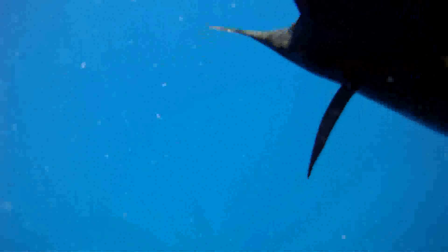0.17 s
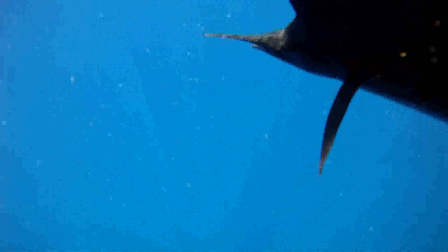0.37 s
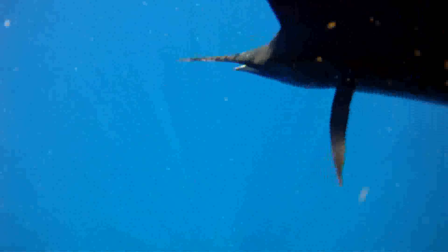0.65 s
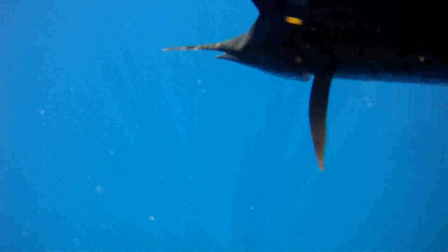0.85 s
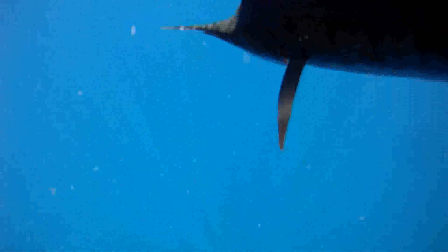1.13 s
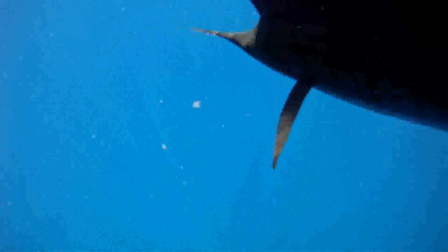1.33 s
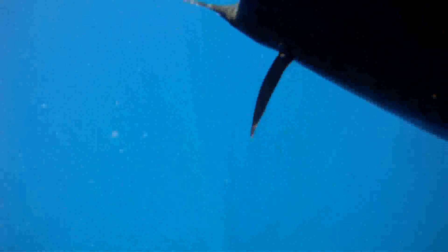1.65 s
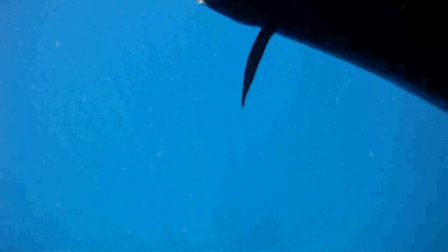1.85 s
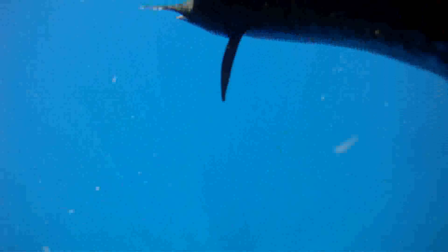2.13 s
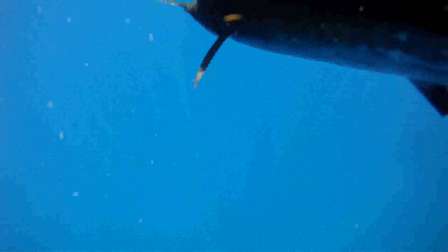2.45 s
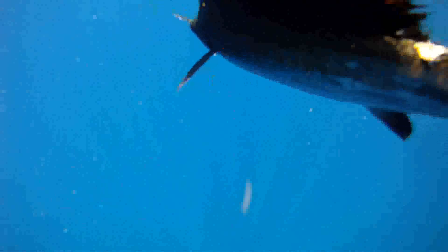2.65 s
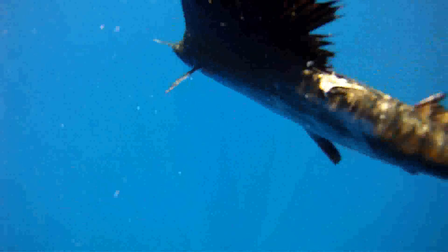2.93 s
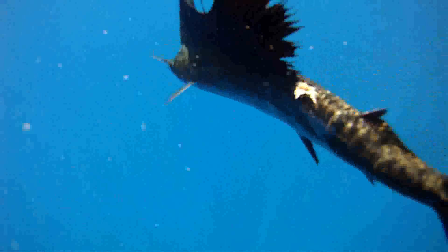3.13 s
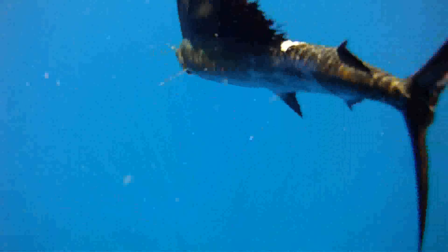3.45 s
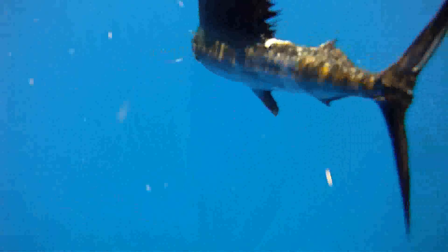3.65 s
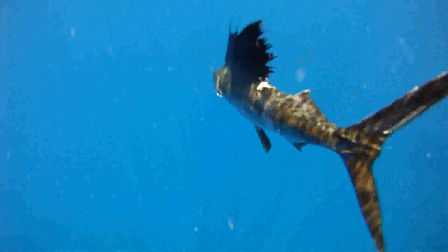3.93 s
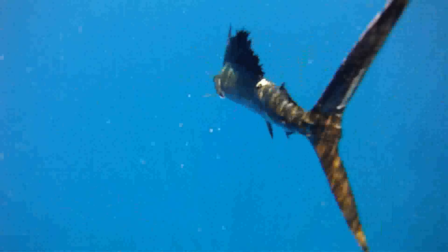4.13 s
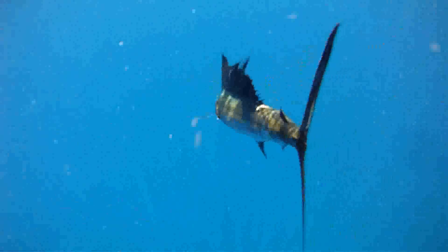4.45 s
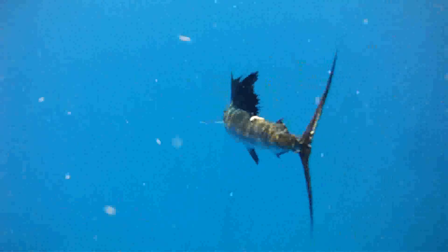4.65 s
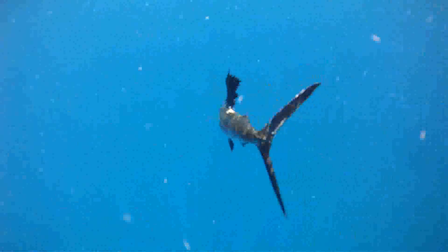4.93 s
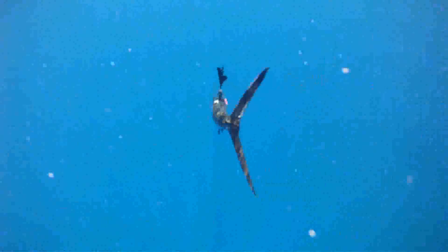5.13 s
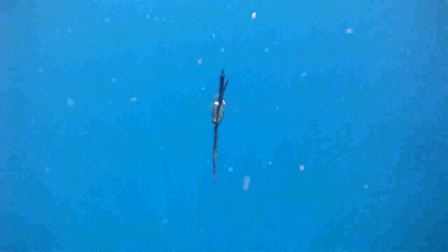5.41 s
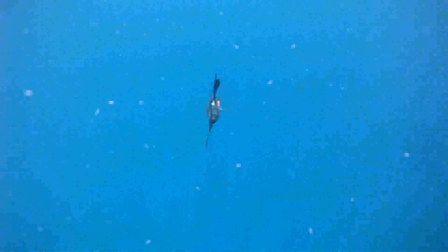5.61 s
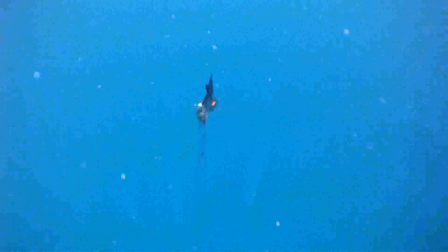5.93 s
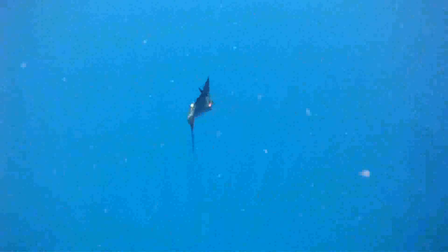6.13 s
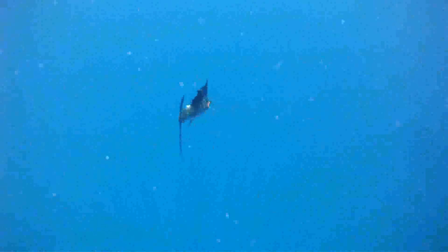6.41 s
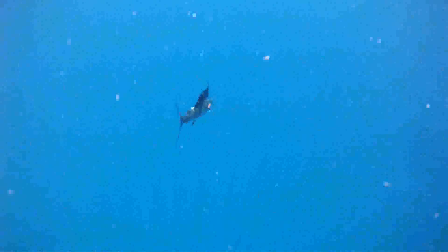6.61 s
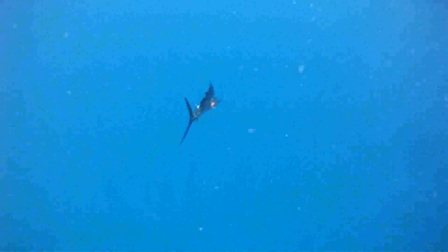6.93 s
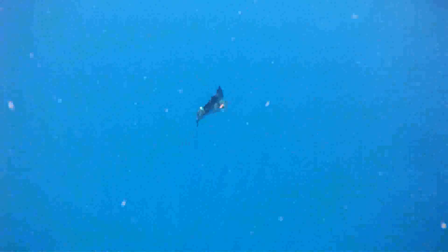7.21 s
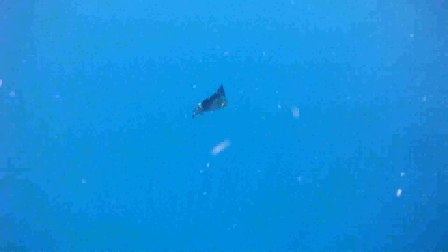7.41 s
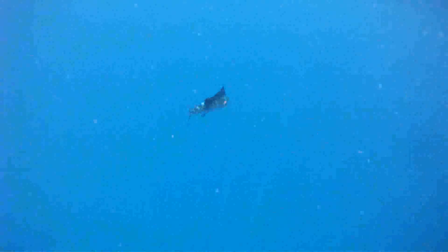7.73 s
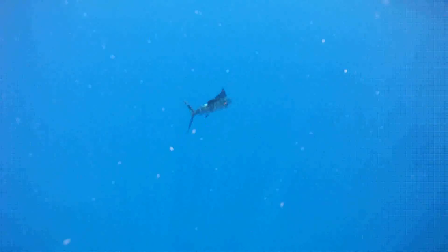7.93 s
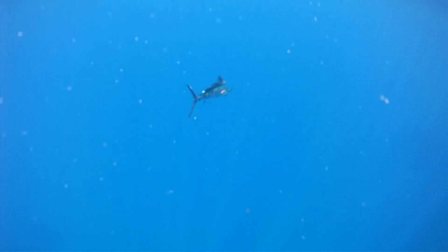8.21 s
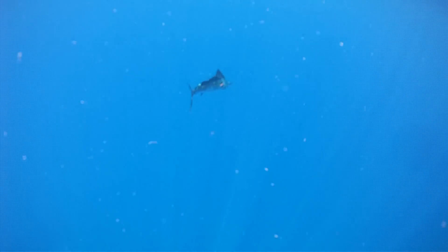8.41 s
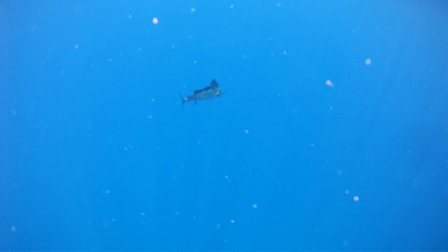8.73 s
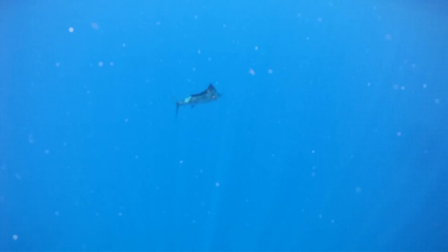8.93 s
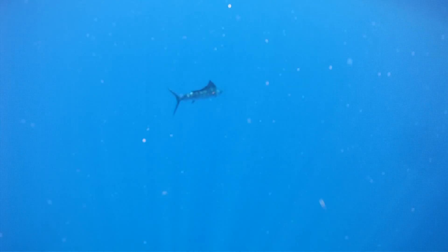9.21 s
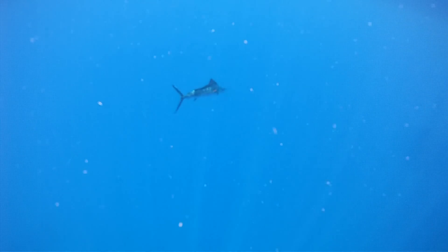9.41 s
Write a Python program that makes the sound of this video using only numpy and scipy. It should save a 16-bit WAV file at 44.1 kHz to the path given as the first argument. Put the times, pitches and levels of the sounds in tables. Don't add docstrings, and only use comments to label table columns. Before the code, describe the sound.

Under water, a diesel boat engine idles steadily, a fast uneven chug with rattle and gear whine. Water sloshes low around a sealed camera case. A hard thump comes early, another near two seconds, then a flurry of scuffs, clicks, squeaks and knocks until about four seconds. Afterwards the engine carries on alone, gradually weaker. The sound is boxy, gritty and low quality.

```python
import sys
import numpy as np
from scipy import signal
from scipy.io import wavfile
from scipy.ndimage import uniform_filter1d

SR = 44100
rng = np.random.default_rng(int(sys.argv[2]) if len(sys.argv) > 2 else 0)


def put_to_file(sound):
    columns = np.atleast_2d(sound).T
    safe = np.clip(columns, -1, 1)
    whole_steps = np.round(safe * 32767)
    wavfile.write(sys.argv[1], SR, whole_steps.astype(np.int16))


def invert_db(level):
    return 10 ** (np.asarray(level, dtype=float) / 20)


N = 421596
TIME = np.arange(N) / SR

# [t/s, level/dB]
STIR = [(0, -48), (.3, -41), (.84, -44), (1.25, -33.5), (1.65, -42), (2.4, -34.5), (3.1, -33.5), (3.7, -23),
        (4.1, -31.5), (4.7, -29.5), (5.1, -32.5), (6.1, -39), (6.6, -34), (7.5, -38.5), (8.1, -38.5),
        (8.6, -35), (9.3, -41), (9.56, -40)]
# [t/s, swell/dB, half length/s]
SURGES = [(.2, 3, .2), (0.564, 14, 0.21), (1.068, 14, 0.11), (1.424, 8, 0.13), (2.08, 21, .06),
          (2.253, 8, 0.11), (2.503, 6, 0.081), (2.797, 13, .09), (3.307, 5, .1), (3.897, 6, 0.2),
          (4.03, 3, .08), (4.25, 4.5, .08), (5.4, 11.5, .08), (6.542, 3, 0.17), (7.254, 4, 0.11),
          (7.897, 3, 0.14)]
# [t/s, peak level/dB, f/Hz, rise/(1/s), t60/s]
BUBBLES = [
    (.524, -25, 445, 2.0, .4),
    (.603, -30, 830, 3.0, .12),
    (.635, -30, 600, 8.0, .15),
    (3.4375, -15, 3750, -7, .018),
    (3.377, -9, 2100, 3, .026),
    (3.371, -17, 3600, 0, .02),
    (3.24, -10, 3500, 0, .012),
    (4.187, -16, 2550, 8, .02),
    (4.173, -18, 2200, 0, .02),
]
# [f/Hz, level/dB, t60/s]
SHELL_MODES = [(350, -9.5, 0.0035), (672, -12.5, 0.023), (1000, -19, 0.004), (1595, -13, 0.0098),
               (2220, -8.5, 0.023), (2630, 1, 0.0051), (3600, -3, 0.014), (4570, -18, 0.0088),
               (5750, 9, 0.011)]
# [t/s, peak level/dB, contact colour f/Hz, length/s]
SCUFFS = [(1.051, -23.5, 300, 0.0221), (1.057, -18, 597, .012), (1.202, -25, 345, 0.071),
          (1.332, -24, 365, 0.056), (2.751, -27, 352, 0.017), (2.851, -28, 900, 0.046),
          (2.961, -22, 424, .0087), (3.011, -23.5, 900, .03), (3.133, -23.5, 460, 0.051),
          (3.333, -18, 376, 0.015), (3.355, -13, 670, .011), (3.488, -17, 624, .014),
          (3.749, -14, 710, 0.025), (3.78, -16, 300, 0.00566), (3.874, -26, 392, 0.011),
          (8.603, -27.5, 500, 0.0063)]
# [t/s, peak level/dB, contact colour f/Hz, length/s]
CLICKS = [(3.241, -22, 3500, .001), (3.3663, -1.5, 1840, .001), (3.369, -28, 3600, .0025),
          (3.376, -15, 2400, .0093), (3.393, -33, 3500, .006), (3.407, -19, 3300, .0026),
          (3.835, -20, 3600, .002), (3.979, -23, 3600, .0042), (3.989, -7, 3020, .0055),
          (4.082, -17, 3700, .002), (4.0835, -14, 1700, .002), (4.176, -38, 2380, .003),
          (4.183, -38, 2700, .001)]
# [t/s, peak level/dB, contact colour f/Hz, length/s, first swing/sign]
KNOCKS = [(0.891, -11.5, 460, 0.004, -1), (1.9807, -16, 520, .001, -1), (1.9822, 1.5, 515, .001, -1),
          (3.218, -12, 650, 0.0033, -1), (3.777, -13, 700, .003, -1), (3.798, -9.5, 740, 0.0026, 1),
          (3.836, -5.5, 1300, .0028, -1), (3.861, -10, 630, .0026, -1), (3.87, -12, 680, 0.00267, 1),
          (3.99, -11, 1000, 0.004, 1), (4.019, -13.5, 1300, 0.0018, 1)]
# [t/s, peak level/dB, f/Hz, t60/s]
SNAPS = [
    (.893, -6, 168, 0.051),
    (1.9839, -3.5, 167, 0.036),
    (3.8372, -2, 127, 0.019),
]
# [t/s, peak level/dB, f/Hz, first swing/sign]
SHOVES = [(0.896, -1.5, 79.5, 1), (1.9852, -8, 64, 1), (2.762, -10.5, 57, 1), (2.948, -16, 43.8, -1),
          (3.206, -18.5, 69, 1), (3.238, -17, 63.3, -1), (3.343, -14, 52, 1), (3.373, -12, 43.7, -1),
          (3.481, -19, 58.6, -1), (3.61, -6.5, 57, 1), (3.666, -10.5, 48, 1), (3.743, -17, 49, -1),
          (3.801, -7.5, 55, -1), (3.842, -14, 50, 1), (3.868, -6, 73.4, 1), (3.887, -26, 55, 1)]
# [t/s, peak level/dB, f/Hz, t60/s]
POLE_RINGS = [(.482, -20, 115, 0.41), (.69, -29, 110, .12), (.911, -21, 56.6, .24),
              (.915, -17.5, 110, 0.19), (1.059, -36, 54, .17), (2.008, -25, 53.7, 0.59),
              (2.201, -29, 94.4, .25), (2.773, -27.5, 159, 0.38), (2.953, -32, 157, 0.6),
              (3.2, -29, 149, 0.24), (3.34, -21.5, 150, .12), (3.502, -14.5, 61, .36),
              (3.776, -17, 150, 0.19), (.25, -34, 130, .3), (3.885, -21, 100, .2), (3.995, -25.5, 90, .2)]
# [t/s, engine cycles done]
CRANK = [(-.112, -1), (.256, 1), (.806, 4), (1.357, 7), (2.463, 13), (4.649, 25), (6.313, 34), (7.786, 42),
         (9.098, 49), (9.662, 52)]
# [low knock level/dB, high knock level/dB]
CYLINDERS = [(-9.5, -8), (-11.5, -31), (-14.5, -0.5), (-14, -25), (-16, -8.5), (-35, -11)]
# [t/s, level/dB, distance/0-1]
ENGINE = [(0.0, -32, 0.4), (0.64, -36.5, 0.3), (0.95, -34.5, 0.5), (1.2, -28.5, 0.7), (1.81, -29, 0.58),
          (2.37, -28, 0.54), (2.9, -26.5, 0.67), (3.4, -29, 0), (3.9, -35, 0.06), (4.21, -30, 0.24),
          (4.85, -28.5, 0.36), (5.22, -32, 0.22), (6.47, -29.5, 0.5), (6.8, -31.5, 0.45),
          (7.27, -37.5, 0.13), (7.59, -38.5, 0.27), (8.41, -34.5, 0.25), (9.56, -34.5, 0.02)]
# [f/Hz, width/Hz, near level/dB, far level/dB]
LOW_MODES = [(349, 39, -10.5, -15.5), (500, 29.6, -2, -8.5), (582, 78, -0.5, -3), (666, 54.4, 5.5, 3.5),
             (747, 74, 4.5, -0.5), (824, 257, -5, -11)]
# [f/Hz, width/Hz, near level/dB, far level/dB]
HIGH_MODES = [(1300, 161, 2, -2), (1494, 126, 2.5, 0.5), (1700, 210, -2.5, -12), (1850, 33, -24, -8.5),
              (2144, 152, -1, -4), (2390, 140, 2, -4.5), (2710, 56, -13, -8), (3130, 510, -14, -20),
              (3435, 330, -14.5, -22.5), (3713, 164, -12.5, -21.5), (4094, 640, -20.5, -27.5),
              (4846, 110, -16.5, -18), (5384, 580, -15.5, -20.5)]
# [multiple of tooth rate, level over the low ring/dB]
GEAR = [(1, -27), (3, -13), (4, 1.5), (8, -22)]
# [t/s, fourth multiple of the tooth rate f/Hz]
MESH = [(0, 653), (1.2, 648), (1.7, 657), (2.15, 655), (2.55, 641), (3.1, 663), (3.6, 653), (4.9, 653),
        (5.25, 634), (5.7, 650), (6.2, 645), (6.6, 655), (7.1, 648), (7.6, 652), (8.35, 633), (9.56, 655)]
# [place in cycle/0-1, half length/0-1, depth/dB]
LULLS = [(.94, .045, 8), (.29, .03, 3), (.62, .03, 2.5)]
# [t/s, depth/dB, recovery/s]
DUCKS = [
    (0.902, 10, 0.084),
    (1.99, 16, 0.16),
    (3.842, 5, 0.025),
]


def rms_one(x):
    return x / np.sqrt(np.mean(x ** 2) + 1e-20)


def in_time(rows):
    s, *columns = np.transpose(rows)
    return [np.interp(TIME, s, c) for c in columns]


def drift(rate_hz):
    knots_hz = 200
    knots = rng.standard_normal(int(N / SR * knots_hz) + 400)
    r = np.exp(-2 * np.pi * rate_hz / knots_hz)
    slow = rms_one(signal.lfilter([1], [1, -2 * r, r * r], knots)[300:])
    return np.interp(TIME * knots_hz, np.arange(len(slow)), slow)


def band(x, low_hz, high_hz, order=2):
    return signal.sosfilt(signal.butter(order, [low_hz, high_hz], "band", fs=SR, output="sos"), x)


def add(out, s, sound):
    at = round(s * SR)
    out[at:at + len(sound)] += sound[:N - at]


def water():
    stir_db, = in_time(STIR)
    surge_db = sum(db * np.clip(1 - abs(TIME - s) / half_s, 0, 1) for s, db, half_s in SURGES)
    handled_until_s, settle_s = 3.91, 0.38
    calm = np.clip((TIME - handled_until_s) / settle_s, 0, 1)
    slosh_db = stir_db + surge_db
    rumble_db = -47.5 + 0.36 * (stir_db + 36) + 0.47 * surge_db - 9 * calm
    gurgle_db = -46.5 + 0.31 * (stir_db + 32.5) + 0.22 * surge_db - 7.5 * calm
    slosh = band(band(rng.standard_normal(N), 9.4, 61.7, order=3), 25.9, 58)
    rumble = band(rng.standard_normal(N), 83.5, 115.4)
    gurgle = band(rng.standard_normal(N), 159.6, 187.0)
    gurgle = gurgle + invert_db(-3.5) * band(rng.standard_normal(N), 180, 443)
    layers = [(slosh, slosh_db, 1.8), (rumble, rumble_db, 3.5), (gurgle, gurgle_db, 3.0)]
    return sum(invert_db(db + lumps_db * drift(10.0)) * rms_one(noise) for noise, db, lumps_db in layers)


def bubbles():
    out, t = np.zeros(N), TIME[:SR // 3]
    for s, db, hz, rise, t60_s in BUBBLES:
        envelope = invert_db(db - 60 * t / t60_s) * (1 - np.exp(-t / 0.0028))
        add(out, s, envelope * np.sin(2 * np.pi * hz * (t + rise * t * t / 2)))
    return out


def taps():
    out, t = np.zeros(N), TIME[:SR // 10]
    crack = rng.standard_normal(len(t))
    every = [(*row, 1) for row in SCUFFS + CLICKS] + KNOCKS
    draws = rng.random((len(every), 30))
    for (s, db, colour_hz, length_s, swing), draw in zip(every, draws):
        count = int(np.clip(round(1 + np.log2(length_s * 1000)), 1, 8))
        order = np.arange(count)
        when_s = (order + 0.72 * draw[:count] * (order > 0)) / count * length_s
        contacts = np.zeros(len(t))
        contacts[(when_s * SR).astype(int)] = np.sign(swing) * (.5 + .5 * draw[8:8 + count])
        shell = invert_db(3 - 60 * t / 0.016) * crack
        for (hz, level_db, t60_s), u in zip(SHELL_MODES, draw[16:]):
            shell = shell + invert_db(level_db + 1.5 * (u + 2.0) - 60 * t / t60_s) * np.sin(2 * np.pi * hz * t)
        tap = signal.fftconvolve(contacts, shell)[:len(t)]
        tap = band(tap, colour_hz * 0.49, colour_hz * 1.436, order=3)
        add(out, s, invert_db(db) * tap / np.max(np.abs(tap)))
    return out


def thumps():
    out, t = np.zeros(N), TIME[:SR // 2]
    blows = [(s, db, hz, t60_s, -1, .03) for s, db, hz, t60_s in SNAPS]
    for s, db, hz, swing in SHOVES:
        blows.append((s, db, hz, (1.3 - 0.12 * db) / hz, swing, .26 - .014 * db))
    blows += [(s, db, hz, t60_s, 1, 0.0035 * hz) for s, db, hz, t60_s in POLE_RINGS]
    for s, db, hz, t60_s, swing, build in blows:
        swell = 1 - np.exp(-(t * hz / max(build, .01)) ** 2)
        swings = np.sin(2 * np.pi * hz * t) * invert_db(-60 * t / t60_s) * swell
        add(out, s, np.sign(swing) * invert_db(db) * swings / np.max(np.abs(swings)))
    return out


def resonances(x, modes, distance, patchy_db):
    out = 0
    for k, (hz, width_hz, near_db, far_db) in enumerate(modes):
        r = np.exp(-np.pi * width_hz / SR)
        poles = [1, -2 * r * np.cos(2 * np.pi * hz / SR), r * r]
        ring = signal.lfilter([(1 - r * r) / 2, 0, (r * r - 1) / 2], poles, x)
        level_db = near_db + (far_db - near_db) * distance + patchy_db * drift(4.5)
        out = out + (-1) ** k * ring * invert_db(level_db)
    return rms_one(out)


def firings(cycles, knock_db, t60_s, snap_db, luck):
    stroke = np.floor(cycles * 6).astype(int)
    at = np.flatnonzero(np.diff(stroke)) + 1
    kicks = np.zeros(N)
    kicks[at] = invert_db(np.array(knock_db)[stroke[at] % 6] + 1.5 * luck[:len(at)])
    beat = signal.lfilter([1], [1, -invert_db(-60 / (t60_s * SR))], kicks) + 1
    return beat * rng.standard_normal(N) + invert_db(snap_db) * kicks, beat


def gear_whine(teeth, low_beat):
    shake = .12 * drift(5.0) + .17 * drift(14.0)
    whine = sum(invert_db(db + 1.5 * drift(3.2)) * np.sin(k * (2 * np.pi * teeth + shake)) for k, db in GEAR)
    return whine * rms_one(uniform_filter1d(low_beat, size=220))


def singing_plate(chopped):
    middle_s, half_s = 4.85, 0.87
    facing = np.sqrt(np.clip(1 - ((TIME - middle_s) / half_s) ** 2, 0, 1))
    return invert_db(-11) * facing * resonances(chopped, [(1828, 24, 0, 0)], 0, patchy_db=1.0)


def engine():
    low_db, distance = in_time(ENGINE)
    high_db = -36.5 + 0.59 * (low_db + 31)
    distance = np.clip(distance + np.clip((TIME - 4.2) / 1.1, -.5, .5), 0, 1)
    cycles, = in_time(CRANK)
    teeth = np.cumsum(in_time(MESH)[0]) / 4 / SR
    low_knock_db, high_knock_db = np.transpose(CYLINDERS)
    luck = np.clip(rng.standard_normal(400), -1.5, 1.5)
    low_drive, low_beat = firings(cycles, low_knock_db, t60_s=.08, snap_db=27, luck=luck)
    high_drive, _ = firings(cycles, high_knock_db, t60_s=.2, snap_db=22, luck=luck)
    low = resonances(low_drive, LOW_MODES, distance, patchy_db=.6)
    chopped = (1 + 0.24 * np.cos(2 * np.pi * teeth)) * high_drive
    high = resonances(chopped, HIGH_MODES, distance, patchy_db=0.84) + singing_plate(chopped)
    whine = gear_whine(teeth, low_beat)
    lull_db = sum(db * np.clip(1 - ((cycles % 1 - at) / half) ** 2, 0, 1) for at, half, db in LULLS)
    low_db = low_db - 1.5 - lull_db
    high_db = high_db + 3.5 - .55 * lull_db
    return invert_db(low_db) * (band(low, 201, 1900) + whine) + invert_db(high_db) * band(high, 1365, 6360)


def ducking():
    loss_db = 0
    for s, db, back_s in DUCKS:
        loss_db = loss_db + db * (TIME > s) * np.clip(1 - ((TIME - s) / back_s) ** 2, 0, 1)
    return invert_db(-uniform_filter1d(loss_db, size=200))


def scene():
    return (ducking() * (water() + engine()) + bubbles() + taps() + thumps())[None]


def roll_off(x):
    return signal.sosfilt(signal.butter(12, 16060, fs=SR, output="sos"), x)


def record(dry):
    x = signal.sosfilt(signal.cheby2(8, 45, 6150, fs=SR, output="sos"), dry)
    coarse = signal.resample_poly(x, 40, 147, axis=1, window=("kaiser", 2))
    held = np.clip(np.repeat(coarse, 4, axis=1), -1, 1)
    x = signal.resample_poly(held, 147, 160, axis=1)[:, :N]
    x = np.pad(x, ((0, 0), (0, N - x.shape[1])))
    x = signal.sosfilt(signal.cheby2(18, 38, 15500, fs=SR, output="sos"), np.clip(x, -1, 1))
    return roll_off(0.96 * x)


dry = scene()
out = record(dry)
put_to_file(out)
```